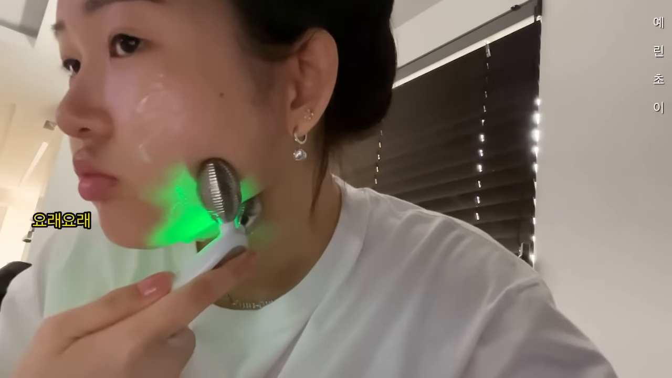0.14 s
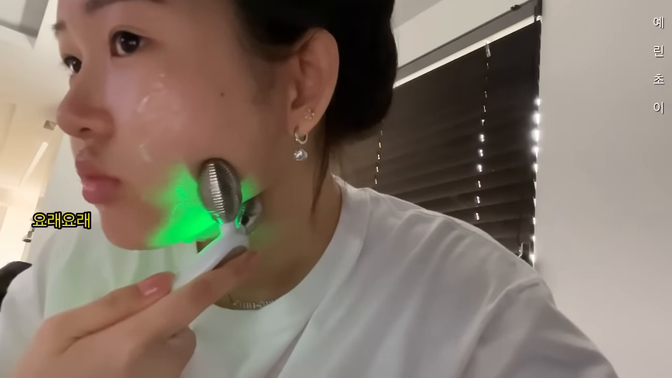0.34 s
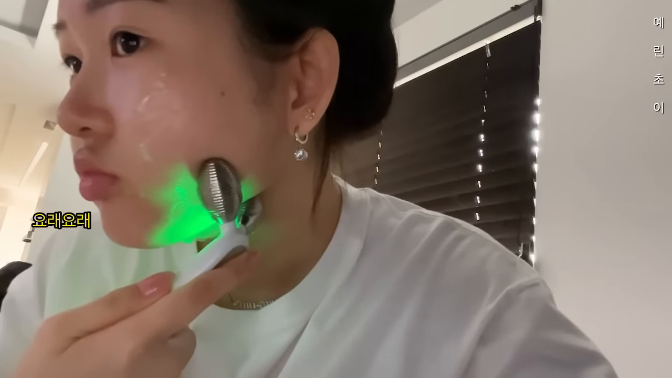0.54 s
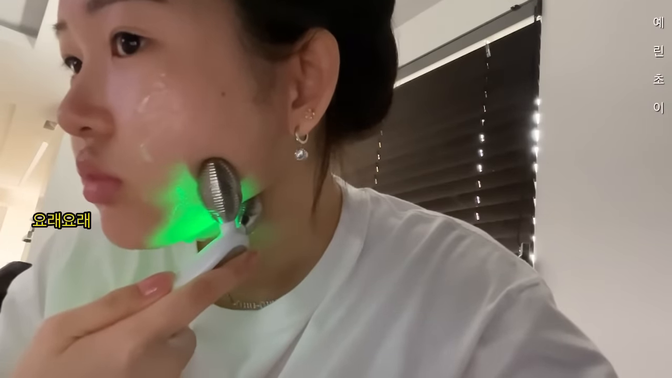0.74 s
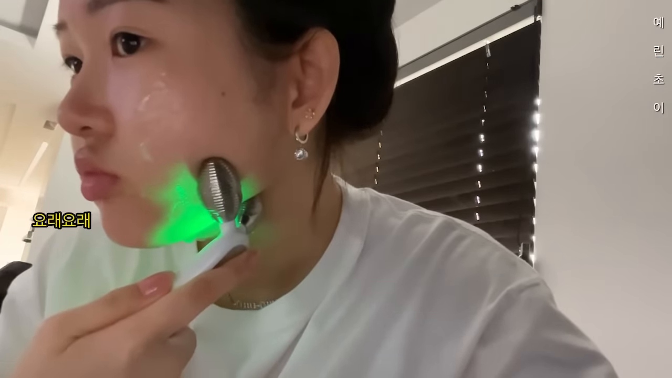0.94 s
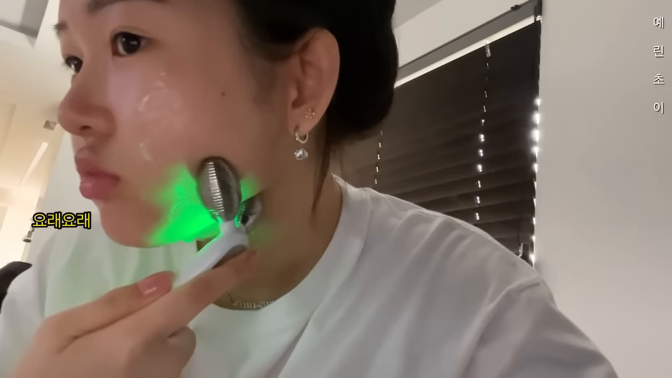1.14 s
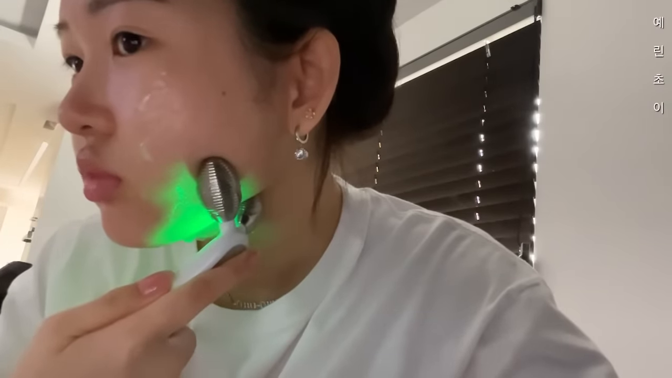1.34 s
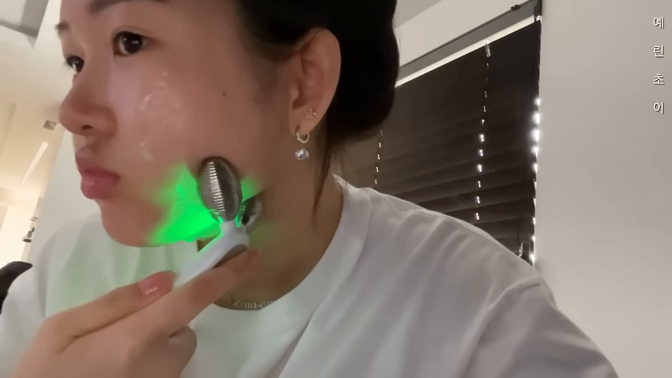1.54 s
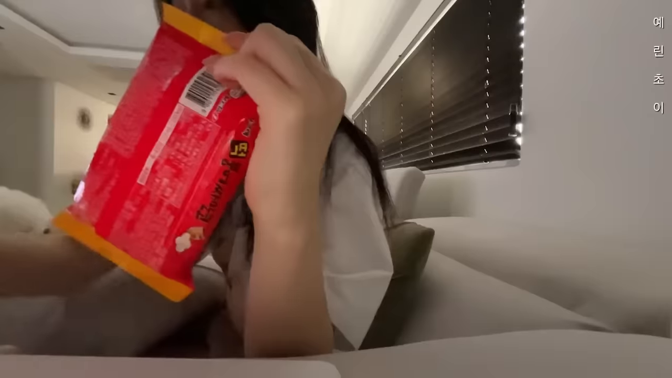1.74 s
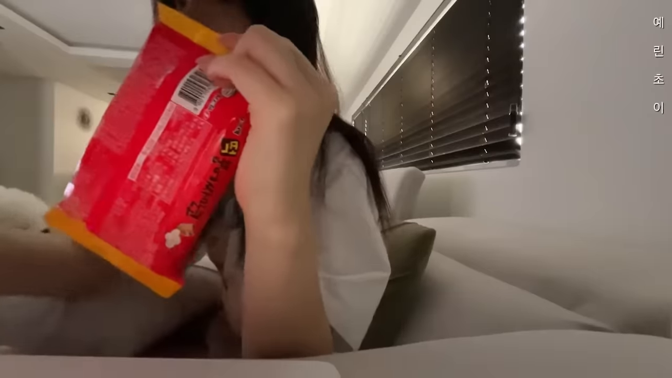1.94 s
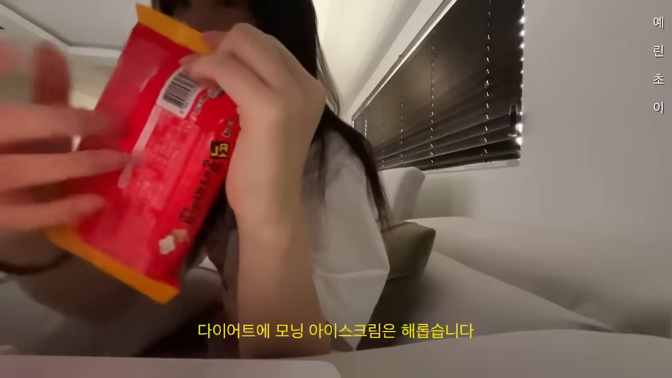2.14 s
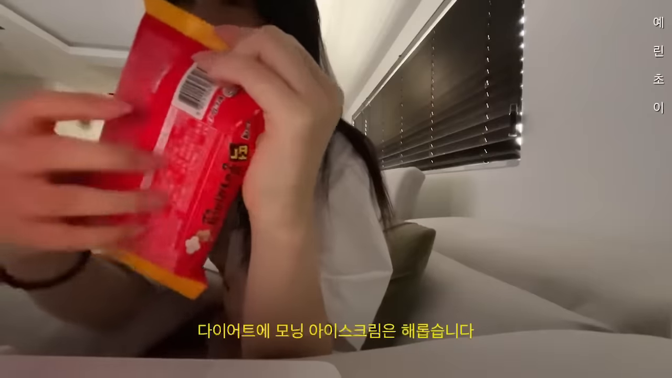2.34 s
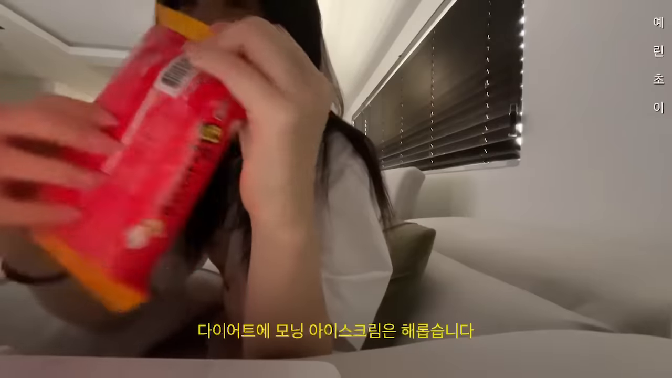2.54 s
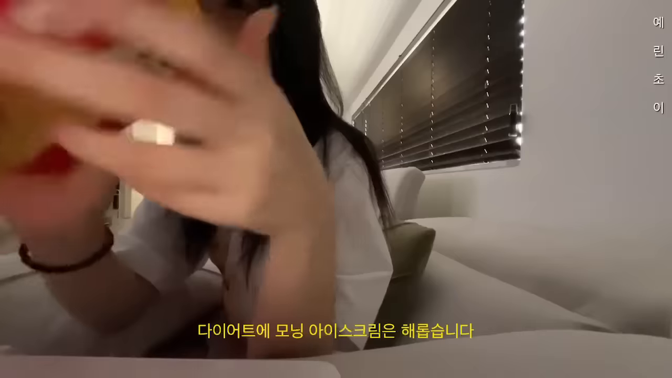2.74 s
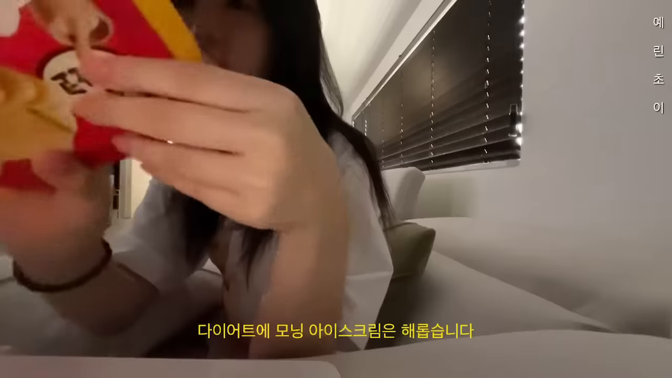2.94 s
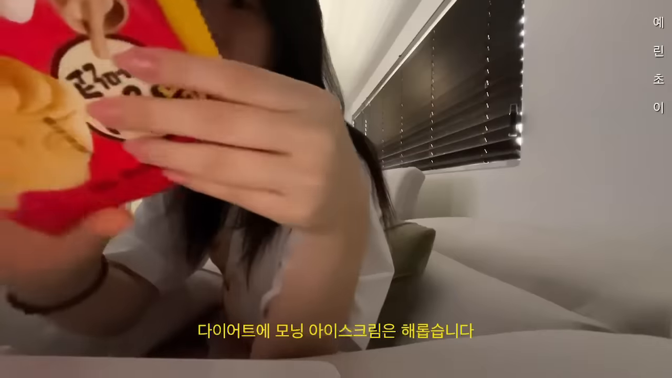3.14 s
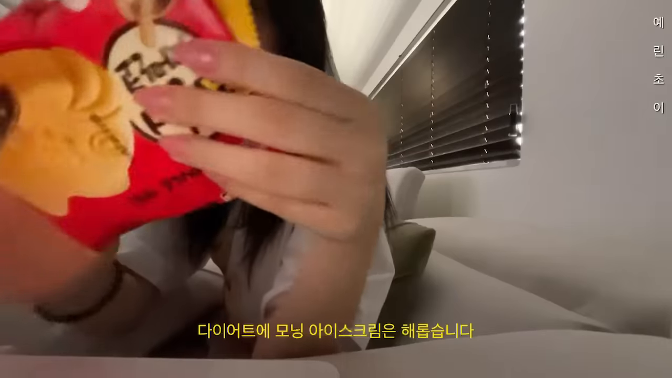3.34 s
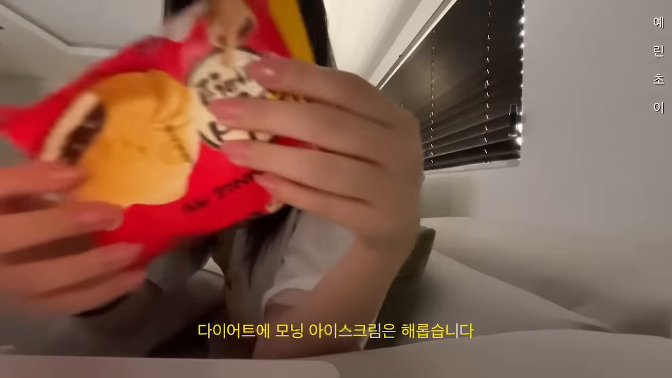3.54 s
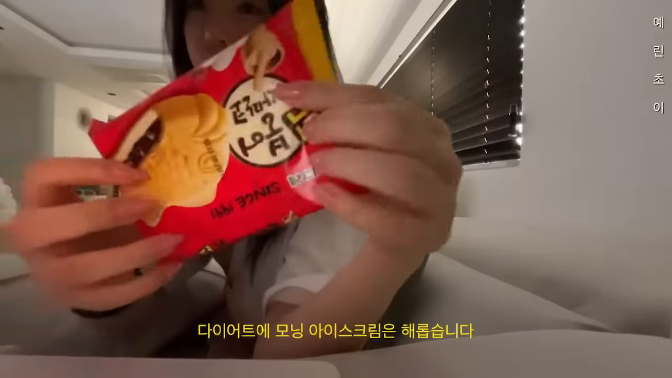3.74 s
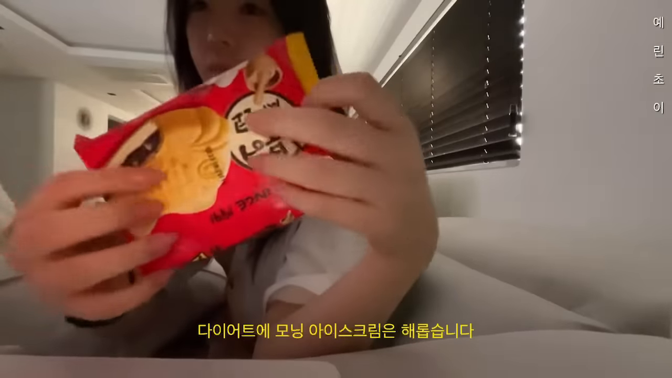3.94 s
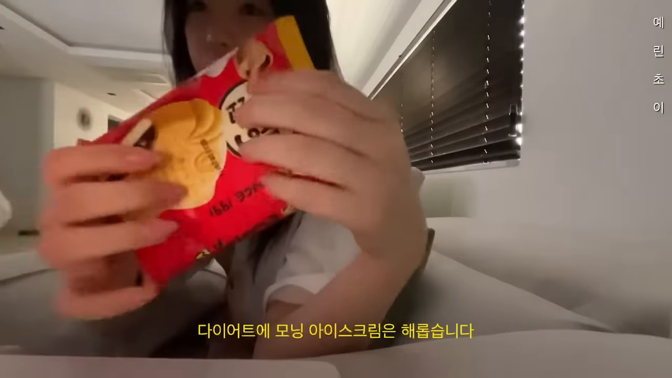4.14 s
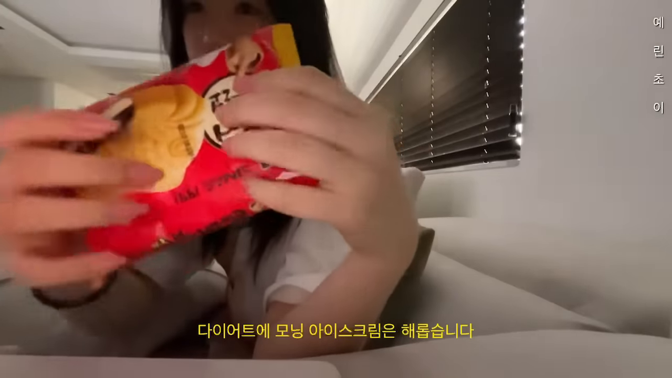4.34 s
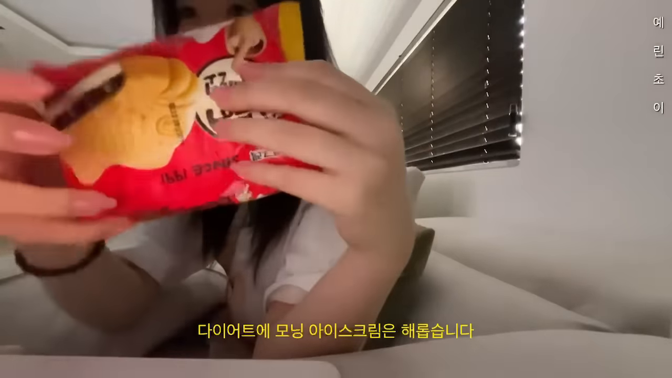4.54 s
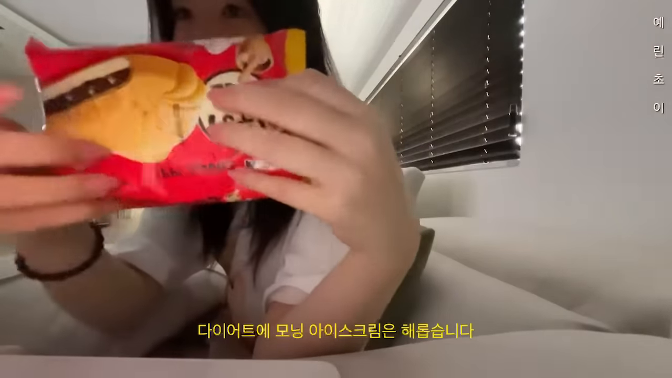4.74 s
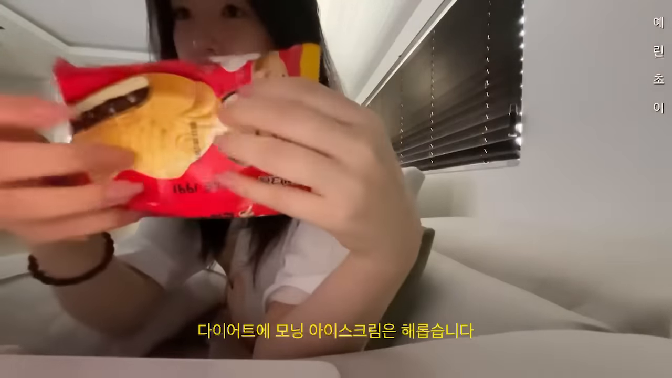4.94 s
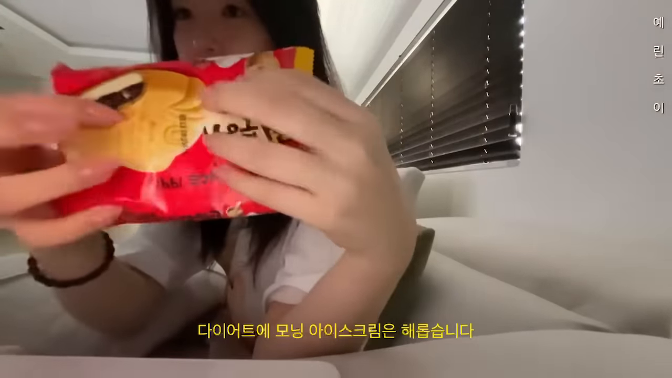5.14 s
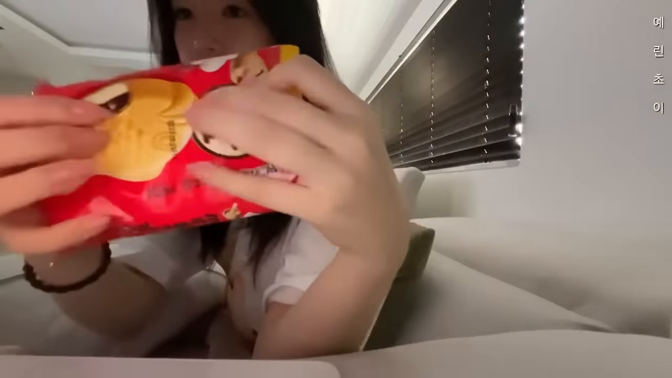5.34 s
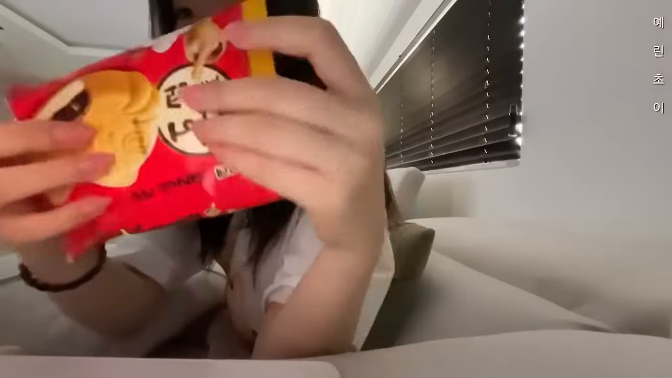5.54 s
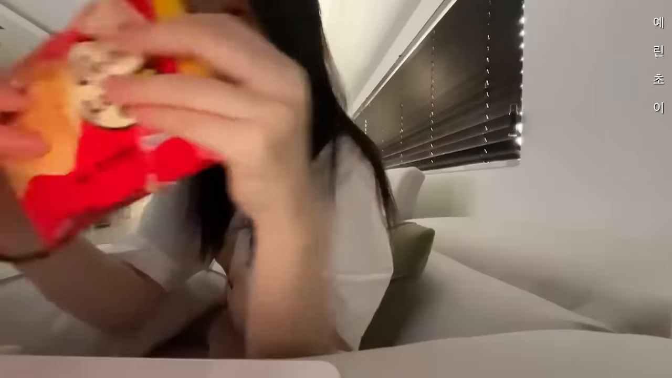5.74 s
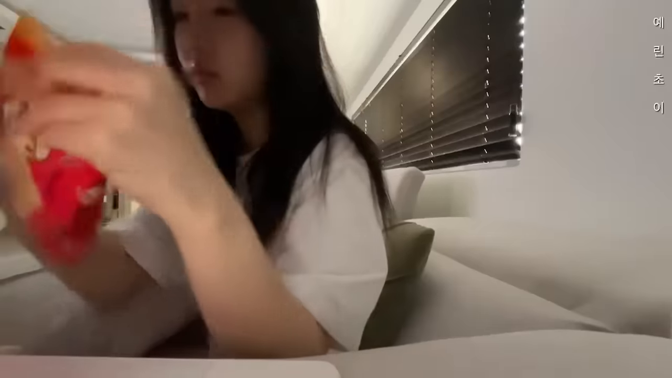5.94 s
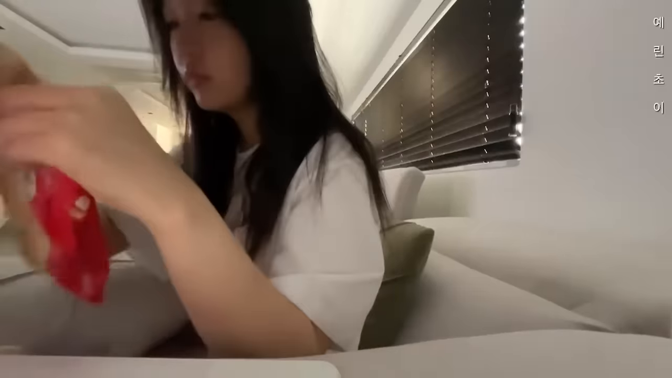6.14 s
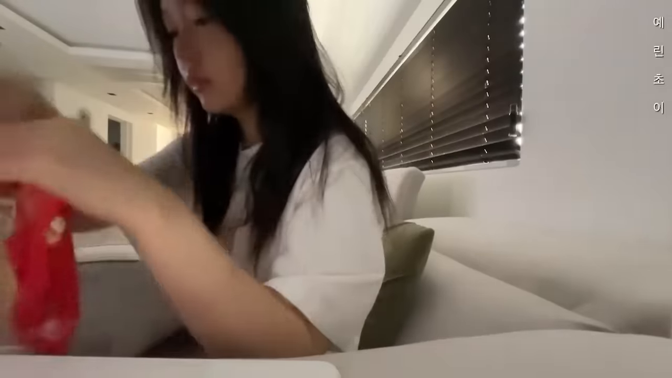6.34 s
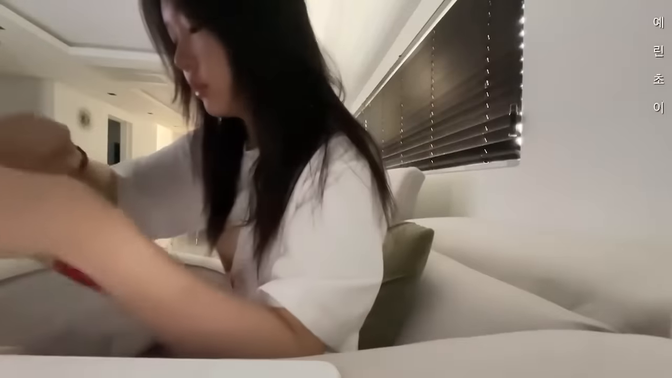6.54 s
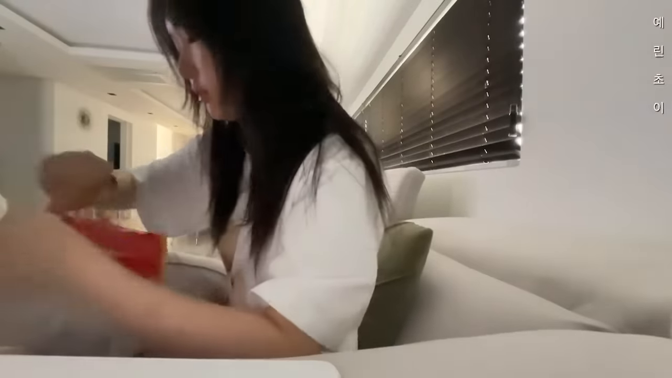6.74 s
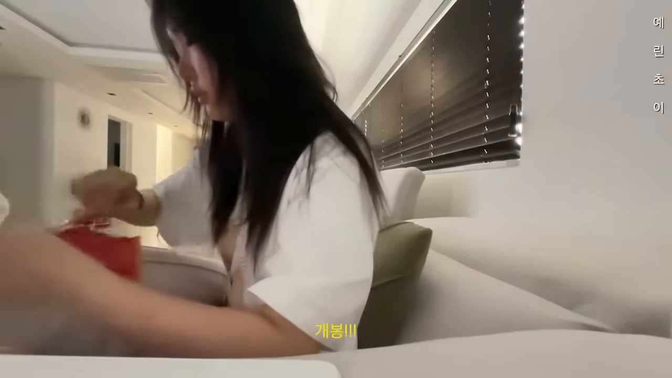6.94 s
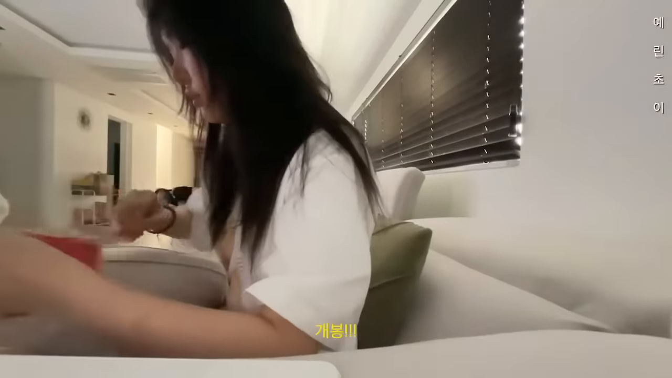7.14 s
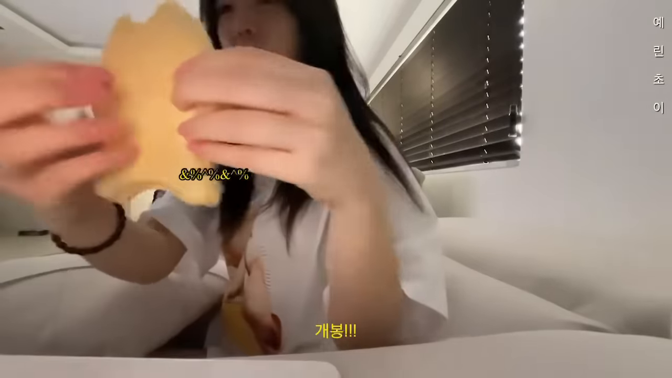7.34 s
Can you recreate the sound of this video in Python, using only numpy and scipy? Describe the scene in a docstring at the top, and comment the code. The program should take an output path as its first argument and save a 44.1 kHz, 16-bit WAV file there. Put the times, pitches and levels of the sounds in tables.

```python
"""For two seconds there is only the quiet air of a furnished room.
Its bass is a little stronger by the time a stiff plastic snack pouch is picked up; the pouch is then
drummed with the fingertips and torn open close by. Creases and dents are noise kicks that ring the film;
thuds are short, sagging tones of trapped air. Rustle, pouch boom and room air are noise shaped by
spectra; the squeak is a rough sine tone."""
import sys
import numpy as np
from scipy import signal
from scipy.io import wavfile
from scipy.ndimage import uniform_filter1d

SR = 44100
rng = np.random.default_rng(int(sys.argv[2]) if len(sys.argv) > 2 else 0)


def to_wav(sig):
    """Store sig (one row per channel, or 1-D mono) as 16-bit WAV at the path in sys.argv[1].

    Samples outside -1..1 are clipped; the rate is SR.
    """
    pcm = np.clip(np.atleast_2d(sig), -1, 1) * 32767
    pcm = np.round(pcm).astype(np.int16)
    wavfile.write(sys.argv[1], SR, pcm.T)  # frames by channels


def gain_from_db(level_db):
    """Convert decibel levels to linear amplitude factors (20 dB per decade)."""
    decades = np.asarray(level_db, float) / 20
    return 10 ** decades


N = 325899  # length of the scene in samples

# Creases that buckle. Each row: start in seconds, level in dB of the loudest half millisecond (nearly),
# pitch of the ringing panel in Hz, relative treble in dB.
CREASES = [(2.186, -20.5, 3730, -25), (2.192, -19, 3280, 9), (2.2418, -15.5, 4360, 14),
           (2.2607, -10.5, 3500, 14), (2.3093, -11.5, 4120, 0), (2.328, -24, 5040, 6),
           (2.3867, -24, 3300, 8), (2.431, -31.5, 3600, 12), (2.5186, -12, 6700, 3),
           (2.5874, -23, 3040, 10), (2.6018, -17.5, 3670, -7), (2.6313, -22.5, 2390, -26),
           (2.6563, -16, 2380, 1), (2.682, -31.5, 4000, 3), (2.8525, -31, 2320, -7),
           (2.9262, -23.5, 5800, 17), (2.9702, -26, 4730, 0), (2.9963, -23, 4800, -16),
           (3.0029, -19.5, 5160, 0), (3.021, -20, 4270, -12), (3.0585, -18, 2080, 2),
           (3.201, -16.5, 3420, 10), (3.2123, -12, 3157, -1), (3.233, -10, 2040, -26),
           (3.2543, -16.5, 2860, 4), (3.2638, -18.5, 3440, 15), (3.2913, -20, 2340, -23),
           (3.3033, -27, 4940, -16), (3.4832, -23.5, 4870, -37), (3.5043, -23, 3700, -27),
           (3.5146, -21.5, 3320, -16), (3.54, -15, 7100, -10), (3.6344, -20, 3020, -11),
           (3.6416, -14, 4470, 3), (3.7041, -15.5, 2900, -22), (3.7596, -14, 4600, 8),
           (3.7927, -23.5, 2220, -31), (3.8097, -25.5, 3600, 10), (3.883, -19.5, 3380, 3),
           (3.9406, -27.5, 1600, -25), (3.9522, -24, 5120, 14), (4.061, -30.5, 2720, -28),
           (4.092, -23.5, 1550, 4), (4.098, -12, 7360, -10), (4.122, -19.5, 5000, 3),
           (4.144, -14.5, 4460, -6), (4.2923, -26.5, 5300, -14), (4.332, -29.5, 1950, -12),
           (4.4211, -17.5, 3170, -40), (4.448, -36, 2680, -21), (4.507, -26.5, 6900, -21),
           (4.536, -32, 4570, -1), (4.574, -18, 4500, -28), (4.6647, -9, 5700, 24),
           (4.7634, -19.5, 5350, -22), (4.8686, -26.5, 4340, -4), (4.8988, -21, 4950, -15),
           (4.915, -29.5, 1470, -15), (4.941, -26.5, 3720, -6), (4.976, -21, 1400, -9),
           (4.9854, -14, 5700, 6), (4.99, -21, 2830, -19), (5.036, -22, 3980, 4), (5.0423, -18.5, 7350, 11),
           (5.0756, -18, 3640, -19), (5.086, -18.5, 4320, -18), (5.117, -25.5, 4500, 10),
           (5.127, -21, 5330, 12), (5.1381, -19.5, 4970, 3), (5.1516, -18.5, 5070, 8),
           (5.2228, -23.5, 3480, -16), (5.242, -18, 2450, -25), (5.2663, -29, 3500, -3),
           (5.297, -29, 3020, 14), (5.3034, -23.5, 3800, -25), (5.3363, -27, 5070, -21),
           (5.354, -17, 7250, -23), (5.3717, -25, 3500, -22), (5.3977, -23.5, 3460, 0),
           (5.4861, -15, 4800, 9), (5.4971, -17, 2180, -30), (5.6014, -18, 7500, -29),
           (5.658, -14.5, 4900, 10), (5.6697, -24, 3080, 13), (5.6746, -10.5, 4350, -2),
           (5.7134, -12.5, 2630, 41), (5.7186, -17, 5360, 27), (5.7228, -13.5, 3170, -9),
           (5.7717, -18.5, 3000, -37), (5.8305, -20, 4780, 4), (5.9864, -19, 5450, -28),
           (6.1865, -22.5, 7040, -10), (6.2683, -25, 4240, -34), (6.31, -21.5, 5400, -23),
           (6.391, -24, 4860, -20), (6.4167, -22, 1670, -1), (6.4339, -19, 6600, -23),
           (6.477, -21.5, 3350, 2), (6.492, -21.5, 7700, 23), (6.514, -26, 3650, -4),
           (6.5272, -19, 4350, -17), (6.5443, -19, 4700, 46), (6.6121, -30.5, 1730, -2),
           (6.6928, -27.5, 5030, 21), (6.7115, -26, 2150, -30), (6.723, -33, 7200, -12),
           (6.73, -21, 1630, -5), (6.738, -17, 7650, 22), (6.7464, -30, 5440, -14),
           (6.792, -23.5, 6100, 24), (6.906, -17.5, 4360, 9), (6.961, -28, 3420, -21),
           (6.976, -21, 7800, 29), (6.9992, -13.5, 6200, 30), (7.0151, -21, 6400, 18),
           (7.0547, -23, 5000, -16), (7.0716, -29, 5270, -6), (7.089, -18, 7650, 19), (7.11, -18, 4660, 26),
           (7.1177, -22, 7270, 14), (7.153, -17.5, 4720, 16), (7.1726, -23, 2300, 2),
           (7.2083, -25, 2300, 29), (7.2544, -35, 3740, 15), (7.3267, -38.5, 6050, 9)]
# Fingertips pushing the air-filled pouch. Each row: time in seconds (about one cycle after the start),
# rough peak in dB, basic pitch of the pouch in Hz.
PUSHES = [(2.196, -25.5, 495), (2.205, -35.5, 87), (2.27, -24.5, 490), (2.317, -29, 163), (2.522, -28, 650),
          (2.608, -29.5, 380), (2.862, -29, 229), (3.025, -28, 540), (3.062, -32, 590), (3.216, -20.5, 402),
          (3.235, -27, 565), (3.523, -25.5, 376), (3.544, -26.5, 560), (3.645, -21, 454), (3.708, -32, 292),
          (3.763, -26.5, 465), (3.81, -25, 540), (3.886, -25, 463), (3.956, -22.5, 484),
          (3.993, -31.5, 600), (4.129, -29, 169), (4.18, -24, 460), (4.253, -40, 432), (4.305, -24, 167),
          (4.363, -37, 570), (4.425, -26.5, 455), (4.452, -35, 368), (4.767, -25, 453), (4.865, -29, 418),
          (4.973, -25, 540), (4.99, -28, 264), (5.039, -28, 460), (5.08, -24, 600), (5.224, -26.5, 495),
          (5.247, -23.5, 456), (5.34, -28.5, 553), (5.357, -22, 400), (5.49, -20, 435), (5.499, -27.5, 170),
          (5.646, -31.5, 290), (5.679, -32.5, 554), (6.039, -40.5, 467), (6.74, -37, 590),
          (7.258, -49, 286)]
# Small dents that pop in or out. Each row: time in seconds (two cycles after the start), peak in dB,
# pitch of the dent in Hz.
POPS = [(3.524, -35, 1480), (3.6903, -25, 1370), (4.1177, -32.5, 940), (4.178, -28, 1690),
        (4.2928, -22, 1490), (4.3935, -31, 1310), (4.4145, -53, 1320), (5.065, -24, 2610),
        (5.328, -28, 1590), (5.387, -23, 2180), (5.743, -27, 2390), (5.918, -27.5, 2000), (6.12, -40, 1090),
        (6.3657, -34, 2120), (6.3853, -31, 1230), (6.442, -25.5, 1410), (6.822, -28, 1720),
        (6.852, -29, 1730), (6.891, -33, 1100), (6.9999, -20, 1415)]
# How hard the hands hold the film between taps. Each row: time in seconds, relative rustle in dB,
# relative pouch boom in dB.
HOLD = [(2.14, -49, -62), (2.3, -54.5, -49.5), (2.66, -54.5, -49), (2.74, -64, -68.5), (2.9, -71, -54),
        (3.1, -48.5, -50), (3.45, -63, -50), (3.6, -51.5, -42), (3.88, -56.5, -55.5), (4.29, -56, -52),
        (4.6, -56.5, -64), (4.95, -57.5, -46), (5.3, -51, -48.5), (5.6, -48.5, -47), (5.75, -47.5, -50.5),
        (6.0, -60.5, -64.5), (6.5, -46.5, -55.5), (6.68, -53.5, -87), (7.1, -73, -48), (7.39, -63.5, -63)]


def evened(x):
    """Scales a sound to an average (rms) strength of 1."""
    return x / np.sqrt(np.mean(x ** 2) + 1e-20)


def read(points, hz):
    """Reads a table over pitch, on a log frequency axis as the ear hears it."""
    f, value = np.transpose(points)
    return np.interp(np.log(hz + 1), np.log(f + 1), value)


def curve(rows, axis):
    """Draws one column of a table as straight lines over time, one value per sample."""
    rows = np.asarray(rows)
    return np.interp(np.arange(N) / SR, rows[:, 0], rows[:, axis])


def add(mix, s, sound):
    """Mixes a sound in at s seconds."""
    part = mix[round(s * SR):][:len(sound)]
    part += sound[:len(part)]


def ring(x, hz, width_hz):
    """A two-pole resonance: rings at hz, and dies faster the wider it is."""
    r = np.exp(-np.pi * width_hz / SR)
    return signal.lfilter([1, 0, -1], [1, -2 * r * np.cos(2 * np.pi * hz / SR), r * r], x)


def noise(colour, size, patchy_db, bins_wide=8, frames_long=8):
    """Noise built from random short spectra, with patches of pitch that grow louder and softer."""
    frames, hz = N // (size // 4) + 5, np.fft.rfftfreq(size, 1 / SR)
    real, imaginary, patches = rng.standard_normal((frames, len(hz), 3)).T
    patches = uniform_filter1d(patches, size=bins_wide, axis=0)
    patches = evened(uniform_filter1d(patches, size=frames_long, axis=1))
    level_db = read(colour, hz)[:, None] + patchy_db * patches
    spectra = (real + 1j * imaginary) * gain_from_db(level_db)
    return evened(signal.istft(spectra, nperseg=size, noverlap=size * 3 // 4)[1][:N])


def snap(hz, treble_db, chance):
    """A crease snaps with a slightly soft onset and a sharp flip, and rings its panel of film."""
    ms = np.arange(len(chance)) / SR * 1000
    fade = np.exp(-ms / 0.32) + 0.23 * np.exp(-ms / 3)
    soft_start = 1 - np.exp(-(ms * hz / 900) ** 2)
    kick = soft_start * fade * chance
    kick[round(55000 / hz)] += 1.37 * np.sign(chance[0])  # the instant of the flip
    panel = evened(ring(kick, hz, 0.21 * hz))
    sheet = evened(ring(ring(kick, 2300, 5400), 2300, 5400))  # the whole sheet flexes a little
    edge = evened(ring(kick, 6650, 11000))  # the sharp edge of the fold
    sound = panel + gain_from_db(-5.5) * sheet + gain_from_db(treble_db - 8.0) * edge
    loudest = np.sqrt(np.max(uniform_filter1d(sound ** 2, size=24)))
    return sound / loudest / 1.085


def snaps():
    """The loud creases, each buckling with its own random kick."""
    out, chance = np.zeros(N), rng.standard_normal((len(CREASES), 900))
    for (s, db, hz, treble_db), row in zip(CREASES, chance):
        add(out, s, gain_from_db(db) * snap(hz, treble_db, row))
    return out


def dents():
    """A dent gives way over about two cycles, rings for a few more and crackles at its rim."""
    out, chance = np.zeros(N), rng.standard_normal((len(POPS), 600))
    for (s, db, hz), row in zip(POPS, chance):
        cycles = hz * np.arange(len(row)) / SR
        give = cycles * np.exp(-cycles / 2.09) * row
        sound = evened(ring(give, hz, 0.16 * hz)) + gain_from_db(-5) * evened(give)
        add(out, s - 2 / hz, gain_from_db(db) * sound / abs(sound).max())
    return out


def crackle(effort_db):
    """Many small creases of every size buckle in clumps, as loud as the handling."""
    base_rate_per_s = 480  # clumps raise and lower this
    clumps = gain_from_db(5 * evened(uniform_filter1d(rng.standard_normal(N), size=500)))
    happens = rng.random(N) < base_rate_per_s * clumps / SR
    size = gain_from_db(11.8 * np.minimum(rng.exponential(1, N), 3)) * happens
    kind, chance = rng.integers(0, 24, N), rng.standard_normal((24, 500))
    out = np.zeros(N)
    for k, hz in enumerate(np.geomspace(1400, 9000, num=24)):
        out += signal.oaconvolve(size * (kind == k), snap(hz, -5, chance[k]))[:N]
    return gain_from_db(effort_db - 0.5) * evened(out)


def hollow(creases):
    """Every crease also knocks the air trapped in the pouch, which rings at 540 Hz."""
    return gain_from_db(-25.5) * ring(creases, 540, 170)


def thuds():
    """A soft push rings the trapped air for two or three cycles, the pitch sagging."""
    out, t = np.zeros(N), np.arange(2500) / SR
    for (s, db, hz), start in zip(PUSHES, rng.random(len(PUSHES))):
        cycles = hz * t
        swell = cycles * np.exp(-cycles / 0.54)
        turns = start + 1.132 * cycles - 0.028 * cycles ** 2  # starts sharp, then sags
        sound = swell / swell.max() * np.sin(2 * np.pi * turns)
        # take out the constant offset, so that the thud averages zero
        sound = sound - swell * sound.sum() / swell.sum()
        add(out, s - 1.048 / hz, gain_from_db(db) * sound)
    return out


def stirred(events, share_db):
    """Each event leaves power in the film that rises quickly and dies away."""
    rise_s, settle_s = 0.0015, 0.0062
    hits, t = np.zeros(N), np.arange(-2000, 6001) / SR
    for s, db, *_ in events:
        stir_db = 0.8 * (db + 21.5) - 21.0 + share_db  # 0.8 dB of stir per dB of blow
        hits[round(s * SR)] += gain_from_db(2 * stir_db)  # doubled dB gives power
    shape = np.where(t < 0, np.exp(np.minimum(t, 0) / rise_s), np.exp(-t / settle_s))
    return np.maximum(signal.oaconvolve(hits, shape)[2000:][:N], 0)


def handling():
    """Levels in dB: the grip's power plus the stir of snaps and thuds, and for rustle also of dents."""
    film = gain_from_db(2 * curve(HOLD, axis=1)) + stirred(CREASES + POPS, -25) + stirred(PUSHES, -16.5)
    air_in = gain_from_db(2 * curve(HOLD, axis=2)) + stirred(CREASES, -37) + stirred(PUSHES, -12)
    return 10 * np.log10(film), 10 * np.log10(air_in)


def slides():
    """Power of the hiss as hands slide over or tear the film, swelling and stopping short."""
    # Each row: start in seconds, length in seconds, relative rustle in dB.
    strokes = [(2.993, 0.39, -50.5), (3.55, 0.081, -37), (4.777, 0.074, -44.5), (5.352, 0.033, -53),
               (5.811, 0.12, -45), (6.376, 0.056, -48), (6.688, 0.093, -35.5), (6.754, .13, -43.5),
               (6.9, 0.3, -37)]
    swell_s, stop_s = 0.025, 0.004
    t, power = np.arange(N) / SR, np.zeros(N)
    for s, length, db in strokes:
        shape = np.clip(np.minimum((t - s) / swell_s, (s + length - t) / stop_s), 0, 1)
        power += gain_from_db(2 * db) * shape ** 2
    return power


def rustle(effort_db, boom_db):
    """Skin and film sliding: a flickering hiss, and the hollow boom of the pouch under it."""
    # Colour of the rustle. Each row: pitch in Hz, relative level in dB per Hz.
    film_colour = [(180, -34), (300, -5.5), (565, 6), (737, 0.5), (1430, 5), (2880, 4.5), (5340, 1.5),
                   (12700, -16.5), (16000, -20)]
    # Colour of the boom. Each row: pitch in Hz, relative level in dB per Hz.
    pouch_colour = [(60, -2), (130, -14), (250, -5.5), (480, -1.5), (750, -16), (1500, -78)]
    flicker_db = 2.3 * np.clip(evened(uniform_filter1d(rng.standard_normal(N), size=400)), -2, 2)
    # panels of film ring for a moment, then shift
    hiss = noise(film_colour, size=256, patchy_db=3.5, bins_wide=3, frames_long=16)
    fizz = signal.lfilter(*signal.butter(2, 7000, "high", fs=SR), hiss)
    hiss = hiss + gain_from_db(1.1 * (effort_db + 39.5)) * fizz  # harder work is brighter
    boom = noise(pouch_colour, size=512, patchy_db=4.5)
    boom = gain_from_db(boom_db - 2 + 1.42 * flicker_db) * boom
    return gain_from_db(effort_db - 1.0 + flicker_db) * hiss + boom


def squeak():
    """Stretched film sings for a moment: a short tone, rough in both loudness and pitch."""
    # Each row: time in seconds, middle pitch in Hz, level in dB before the roughness.
    notes = [(6.275, 556.5, -53), (6.31, 548, -45.5), (6.39, 544, -53.5)]
    t, first, last = np.arange(N) / SR, notes[0][0], notes[-1][0]
    sounding = np.interp(t, [first - 0.01, first, last, last + 0.024], [0, 1, 1, 0])
    rough = 1 + 0.45 * evened(uniform_filter1d(rng.standard_normal(N), size=400))
    pitch_hz = curve(notes, axis=1) * (1 + 0.04 * (rough - 1))
    tone = np.sqrt(2) * np.sin(2 * np.pi * np.cumsum(pitch_hz) / SR)
    return gain_from_db(curve(notes, axis=2)) * sounding * rough * tone


def room(x):
    """Echoes off the walls: sparse taps of random sign, each band dying at its own speed."""
    # Each row: pitch in Hz, time in seconds for the echoes to fall by 60 dB.
    walls = [(300, 0.046), (2000, 0.063), (8000, 0.055)]
    taps = np.zeros(SR // 3)
    at = np.arange(140, len(taps) - 20, 20)
    taps[at + rng.integers(0, 20, len(at))] = rng.choice([-1., 1.], len(at))
    hz, t, z = signal.stft(taps, SR, nperseg=256)
    fading = z * gain_from_db(-60 * t / read(walls, hz)[:, None])
    tail = signal.istft(fading, SR, nperseg=256)[1]
    return signal.oaconvolve(x, tail / np.linalg.norm(tail))[:N]


def air():
    """Room-tone noise with a changing bass level, and faint uneven shuffling of cloth in the middle."""
    # Colour of the air. Each row: pitch in Hz, relative level in dB per Hz.
    air_colour = [(45, -50), (70, -14), (110, -4), (180, -3), (320, -13), (500, -19), (1200, -31),
                  (2600, -35), (14500, -46)]
    # The last value is held. Each row: time in seconds, extra bass in dB.
    bass_level = [(0, -1), (.7, -0.5), (2.1, 3.5)]
    cloth = noise(air_colour, size=1024, patchy_db=6.5, bins_wide=12, frames_long=5)
    cloth = evened(ring(ring(cloth, 1700, 1300), 1700, 1300))
    tone = noise(air_colour, size=1024, patchy_db=1.5)
    bass = signal.lfilter(*signal.butter(1, 500, fs=SR), tone)
    extra_bass = (gain_from_db(curve(bass_level, axis=1)) - 1) * bass
    return gain_from_db(-66.5) * (tone + extra_bass + gain_from_db(-17) * cloth)


def scene():
    """The pouch enters quickly when the hands close on it; slides add hiss but few creases."""
    held = np.clip((np.arange(N) / SR - HOLD[0][0]) / 0.03, 0, 1)
    effort_db, boom_db = handling()
    sliding = slides()
    creased_db = 10 * np.log10(gain_from_db(2 * effort_db) + gain_from_db(-6) * sliding)
    rubbed_db = 10 * np.log10(gain_from_db(2 * effort_db) + sliding)
    creases = snaps() + dents() + held * crackle(creased_db)
    pouch = creases + hollow(creases) + thuds() + squeak() + held * rustle(rubbed_db, boom_db)
    mono = pouch + gain_from_db(-45) * room(pouch) + air()
    return np.array([mono, mono])


def band_limit(x):
    """A steep low-pass at the top of the band."""
    return signal.sosfilt(signal.butter(12, 16990, fs=SR, output="sos"), x)


def record(dry):
    """One microphone on both channels, deaf to deep bass and the very top."""
    heard = signal.sosfilt(signal.butter(3, 62, "high", fs=SR, output="sos"), dry)
    treble_limit = signal.firwin(255, 15700, window=("kaiser", 8), fs=SR)
    mix = signal.oaconvolve(heard, treble_limit[None], "same", axes=1)
    return band_limit(mix)


dry = scene()
out = record(dry)
to_wav(out)
```